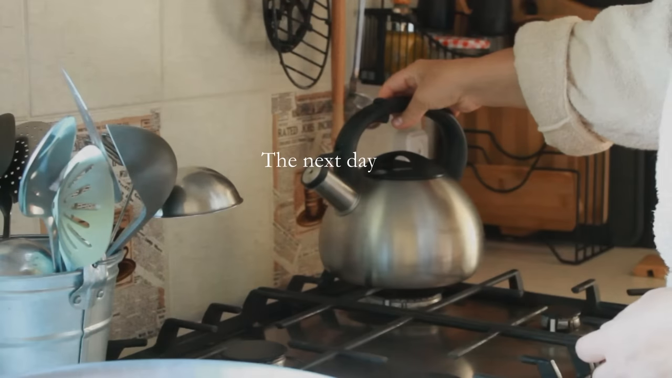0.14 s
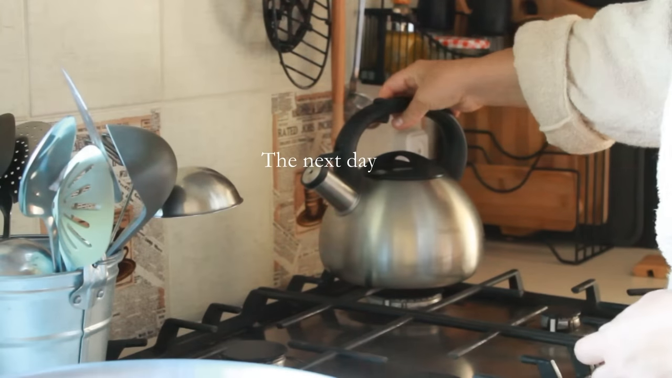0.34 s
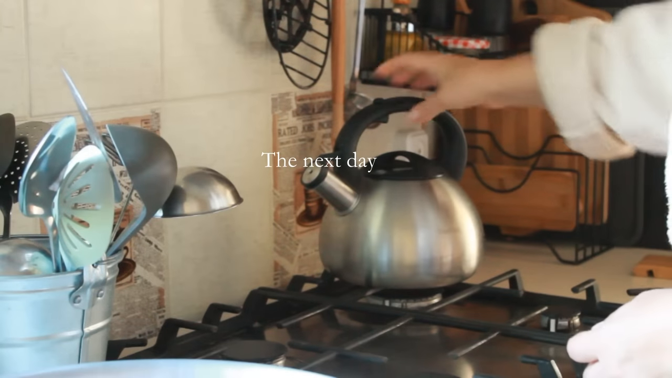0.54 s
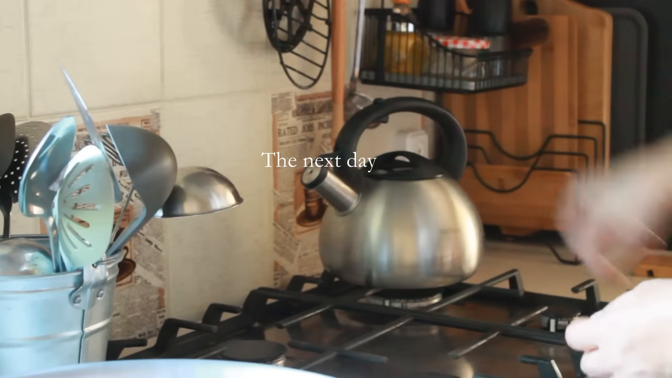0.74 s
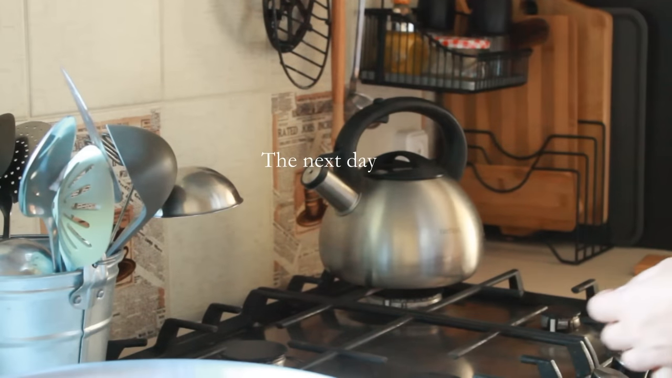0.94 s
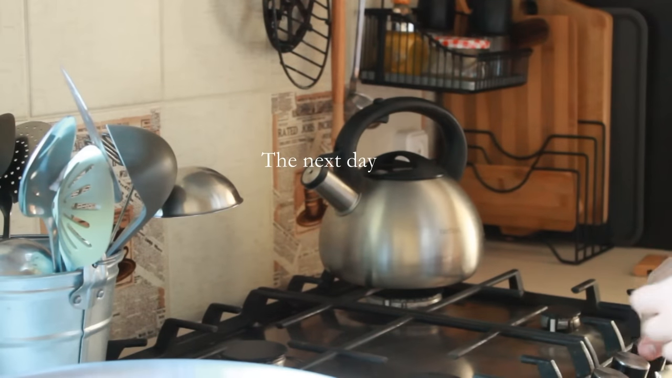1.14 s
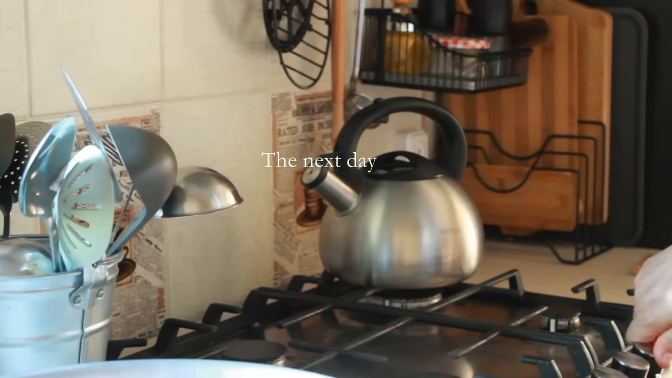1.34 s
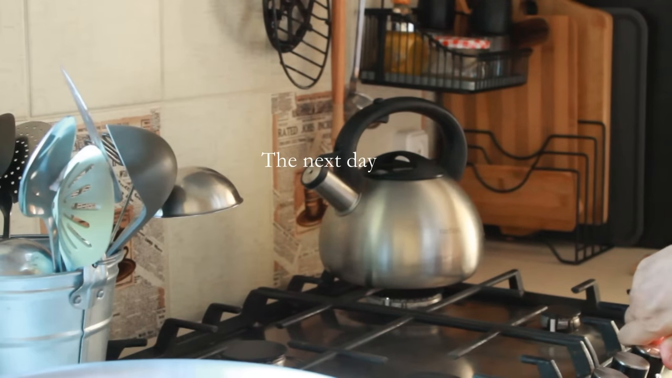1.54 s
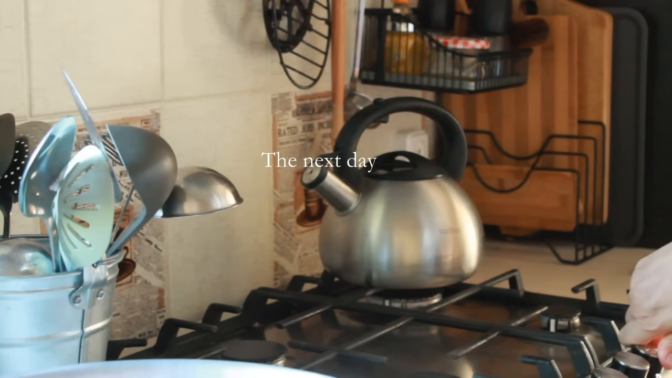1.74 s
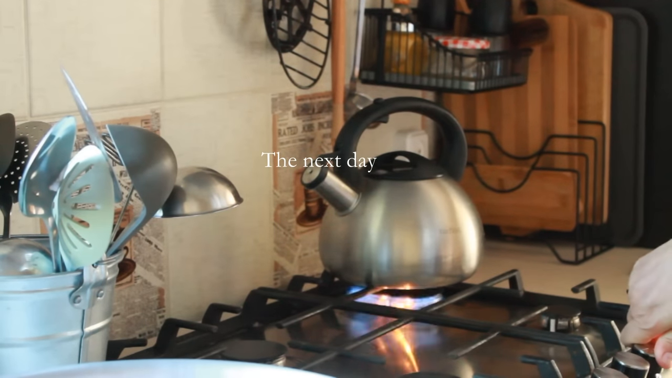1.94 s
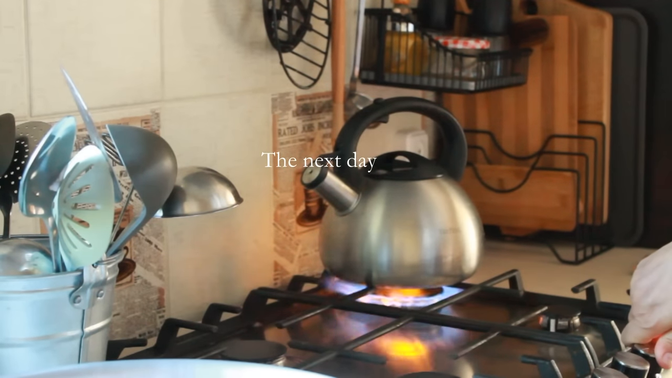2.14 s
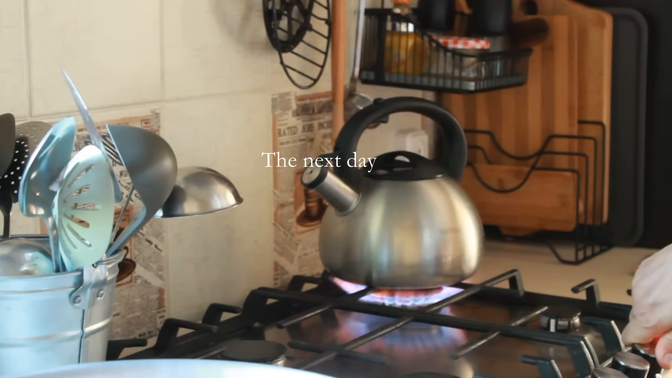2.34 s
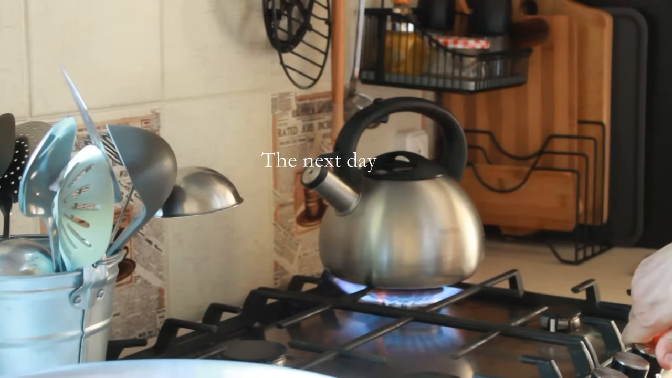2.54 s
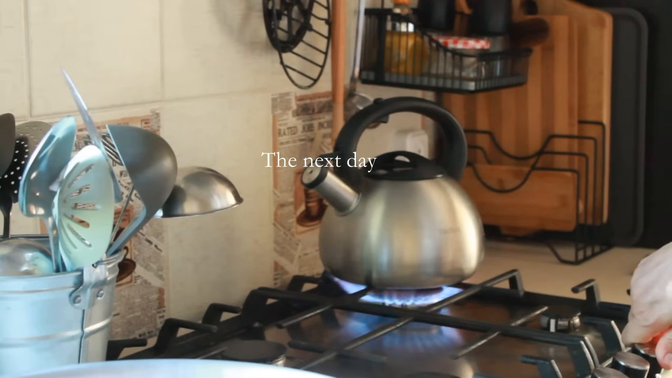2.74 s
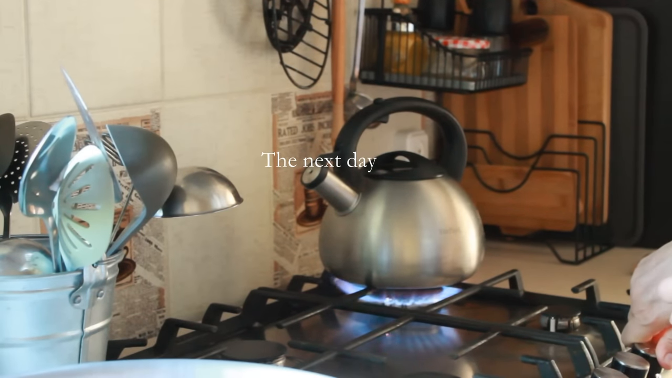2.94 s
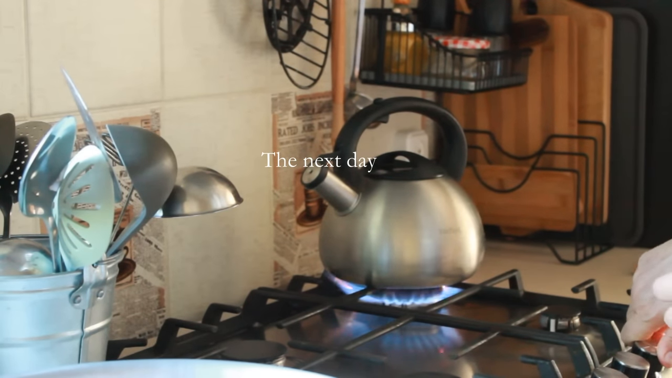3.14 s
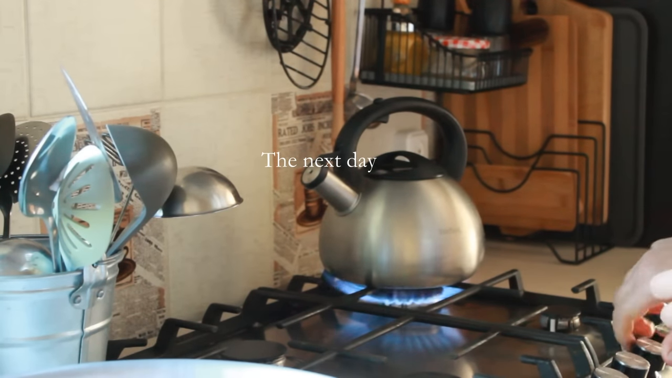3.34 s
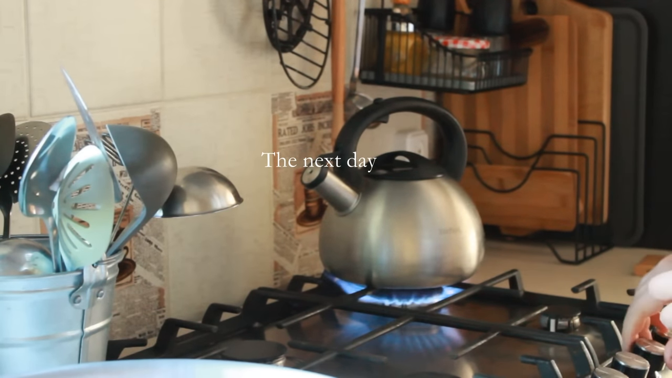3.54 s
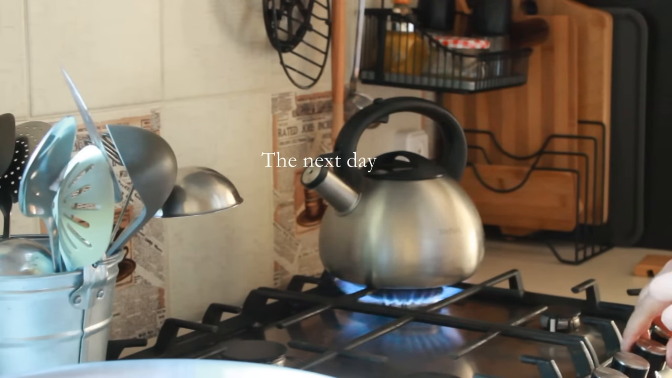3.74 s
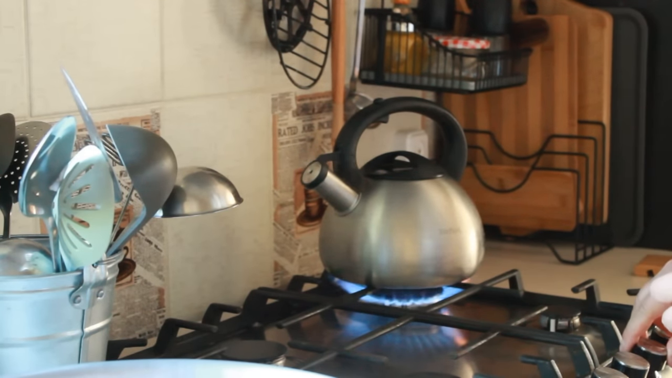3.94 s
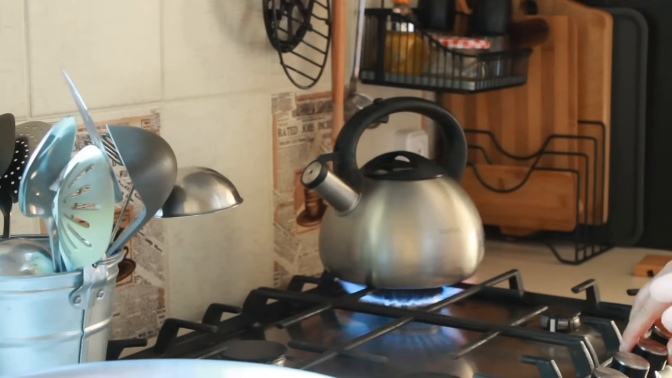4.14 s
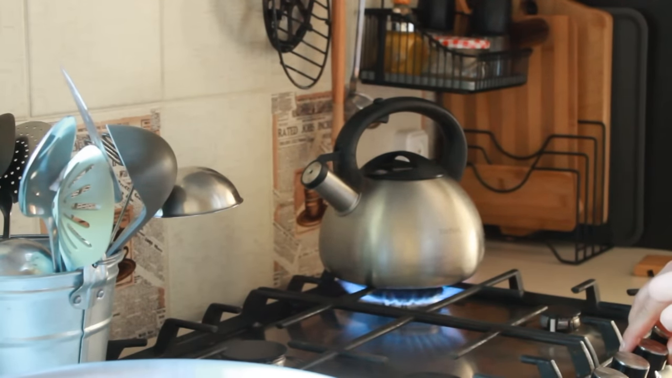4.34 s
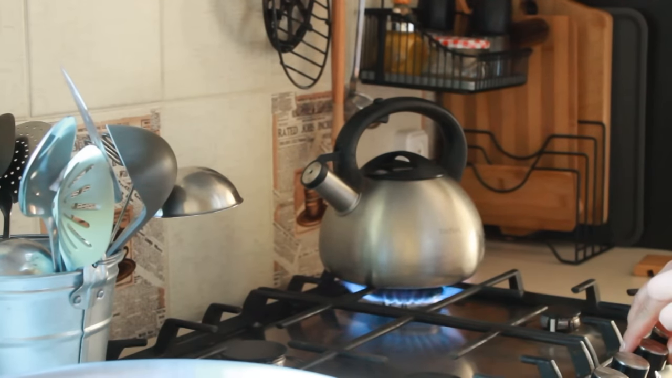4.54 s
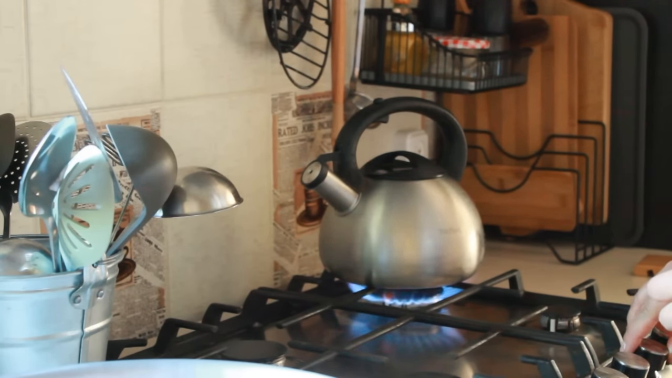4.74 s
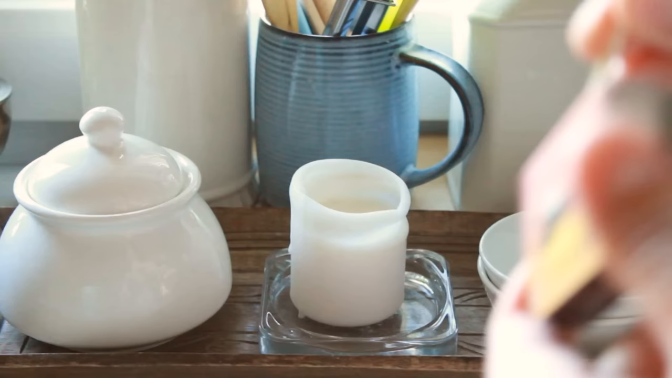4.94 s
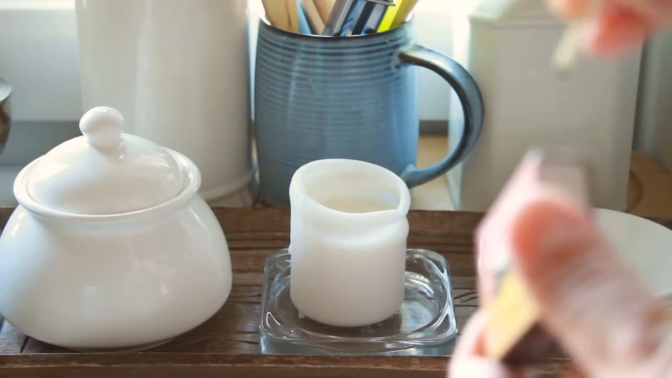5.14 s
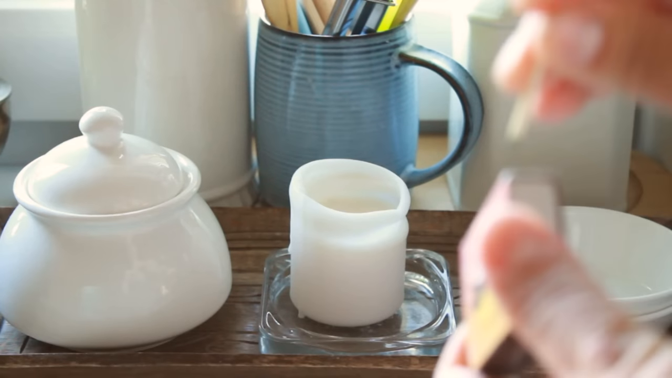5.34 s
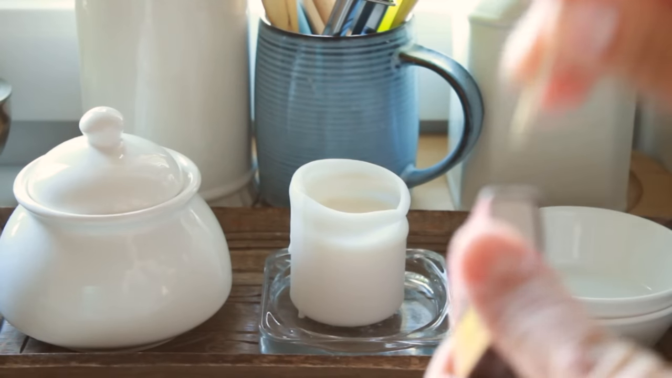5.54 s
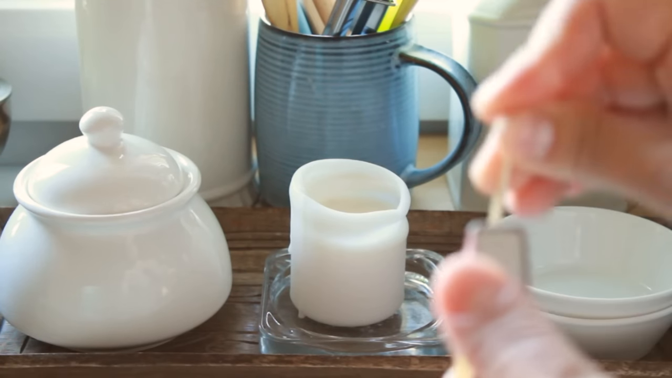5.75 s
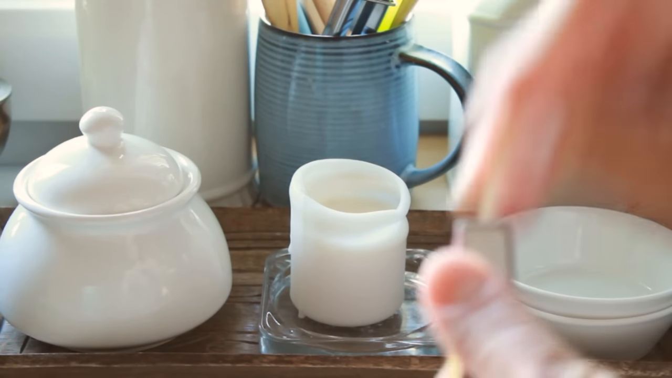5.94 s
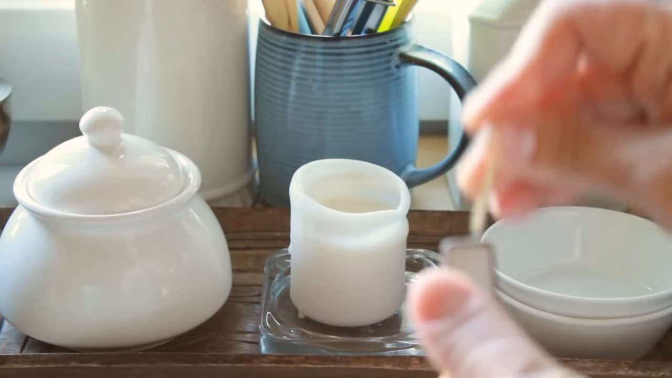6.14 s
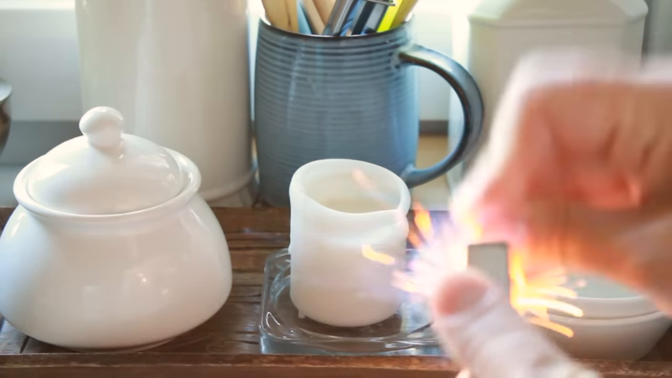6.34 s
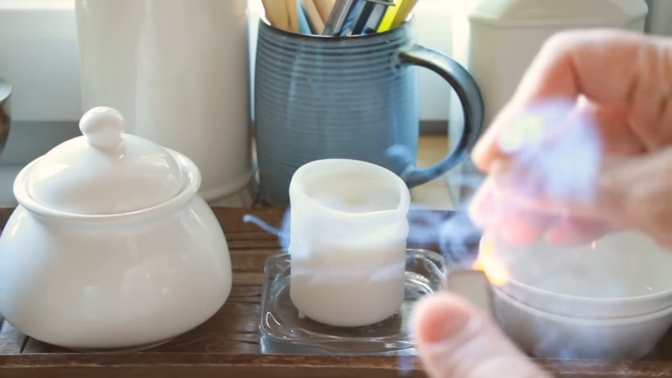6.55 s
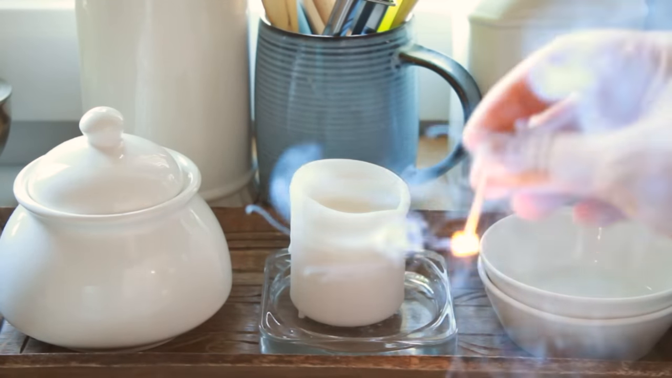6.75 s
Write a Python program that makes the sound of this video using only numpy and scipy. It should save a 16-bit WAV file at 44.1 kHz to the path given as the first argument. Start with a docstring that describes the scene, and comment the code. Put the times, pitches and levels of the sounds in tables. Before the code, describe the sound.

In a quiet tiled kitchen, heard from close by, a metal kettle clanks and rocks briefly on a gas stove. The knob knocks lightly, then sharp, evenly spaced igniter clicks sound over hissing gas as the flame softly catches. The background changes to a low room hum. A match rasps on a hollow cardboard box three times, then bursts alight with a puff and a short, spitting crackle.

```python
"""Lighting a stove and a match

A steel kettle lands on the grate of a gas stove and rings in its natural modes. Gas hisses through the
resonant burner tube, the igniter sparks five times and the flame catches with a soft whoomp. Then, in a
humming corner of the kitchen, a match is struck three times: friction drives the resonances of the
hollow box, and on the last stroke the head flares, fizzes and spits."""
import sys
import numpy as np
from scipy import signal
from scipy.fft import rfft, irfft, next_fast_len
from scipy.io import wavfile
from scipy.ndimage import map_coordinates

SR = 44100
rng = np.random.default_rng(int(sys.argv[2]) if len(sys.argv) > 2 else 0)


def output_pcm(signal):
    """Save a mono or channel-first signal as 16-bit PCM at the path in sys.argv[1].

    Samples are clipped to [-1, 1] before scaling.
    """
    pcm = np.clip(np.atleast_2d(signal).T, -1, 1) * 32767
    wavfile.write(sys.argv[1], SR, np.round(pcm).astype(np.int16))


N = 303849
TIME = np.arange(N) / SR

# Levels in the tables are relative; spectra are interpolated on a logarithmic frequency axis.
# reverberation time of the tiled kitchen: f/Hz, T60/s
ROOM_DECAY = [(150, 0.7), (800, 0.46), (2000, 0.4), (5000, 0.44), (9000, 0.31), (16000, .22)]
# room tone by the stove: f/Hz, level/dB
STOVE_AIR_SPECTRUM = [(15, -53), (25, -27), (59, -10), (92, -31.5), (137, -7.5), (373, -18), (451, -10.5),
                      (659, -10), (2220, -13), (2690, -13), (16000, -30)]
# modes of kettle and grate: f/Hz, level/dB, T60/s before added damping
STEEL_MODES = [(391, -6, 0.67), (855, -3.5, 0.62), (1303, -0.5, 0.54), (2199, -11, 0.5), (3130, -14, 0.42),
               (3250, -4.5, 0.32), (3606, -6.5, 0.36), (3822, -15, 0.3), (4030, -9, 0.38), (4590, -1, 0.4),
               (5210, -9, 0.3), (5520, -16, 0.32), (5660, -11, 0.35), (6210, -11, 0.35), (6440, -17, 0.44),
               (6860, -7, 0.36), (6970, -18, 0.32), (7640, -15, 0.35), (7790, -2.5, 0.4), (8800, -12, 0.38),
               (8560, -17, 0.31), (9300, -10, 0.29), (10142, -23, 0.35)]
# steel chattering on iron: f/Hz, level/dB
CLASH_SPECTRUM = [(500, -35), (1000, -21), (2000, -3.5), (4500, 0), (7500, -2), (10000, -15), (13000, -19),
                  (16000, -18)]
# thud of the stove top: f/Hz, level/dB
THUD_SPECTRUM = [(30, -17), (65, -9), (90, -11), (140, -5.5), (300, -7.5), (470, -0.5), (650, -5.5),
                 (950, -3.5), (1400, -7.5), (2000, -17), (6000, -28), (12000, -49)]
# the handle drops and the knob is pushed in: t/s, level/dB
KNOCK_EVENTS = [(.44, -62.5), (.541, -53), (1.246, -59.5), (1.368, -66.5)]
# a soft blow on the stove: f/Hz, level/dB
KNOCK_SPECTRUM = [(30, -17), (65, -4), (90, -13), (140, -8), (300, -8), (490, 1.5), (650, -4), (950, -5),
                  (1450, -9), (2200, -21), (6000, -40)]
# dull bumps of hand and arm: t/s, level/dB
BUMP_EVENTS = [(.55, -70), (0.969, -66), (5.29, -58), (5.88, -52), (5.971, -56)]
# one such bump: f/Hz, level/dB
BUMP_SPECTRUM = [(30, -14), (70, -16), (140, 1), (230, 1.5), (400, -9), (1500, -73)]
# light clicks of handle, knob and matchbox: t/s, level/dB
TICK_EVENTS = [(.703, -64), (1.28, -62), (1.366, -66), (4.979, -46)]
# rasp of the striking strip, also used for clicks, rustle and fizz: f/Hz, level/dB
GRIT_SPECTRUM = [(800, -29), (1700, 1), (4300, 0), (5600, -4.5), (8000, -5.5), (11000, -17.5), (16000, -16)]
# hiss of the gas jet: f/Hz, level/dB
JET_SPECTRUM = [(59, -41), (100, -47), (322, -6.5), (818, -15.5), (1420, 7.5), (2100, -27), (3320, -3),
                (3780, -22), (4980, -0.5), (5530, -16), (9410, -23), (11200, -19), (16000, -21)]
# burner tube resonances once the burner is hot and settled: f/Hz, bandwidth/Hz, level/dB
TUBE_RESONANCES = [(1287, 80, -4), (3282, 85, 2), (4037, 69, -4.5), (4916, 90, -3.5), (6430, 110, -8.5),
                   (6960, 150, -10.5), (7670, 56, -13), (8960, 47, -8.5), (8700, 55, -11), (9800, 50, -12),
                   (10240, 70, -12), (10800, 55, -4), (11280, 120, -10.5), (11600, 150, -12.5),
                   (13120, 91, -10.5), (13800, 63, -15), (14350, 90, -12), (15300, 300, -15)]
# cold gas in the burner ports: f/Hz, bandwidth/Hz, level/dB
PORT_RESONANCES = [(950, 160, 0.5), (4650, 500, 0.5), (6100, 700, -4), (7580, 200, -1), (11000, 500, -9),
                   (15300, 460, -6)]
# igniter sparks: t/s, level/dB
SPARK_EVENTS = [(1.6312, 0.5), (1.99, 2.5), (2.349, 0), (2.7087, 0), (3.0527, 0)]
# paths from the spark, direct and by way of burner, hob and kettle: delay/s, level/dB
SPARK_PATHS = [(0, 2.5), (.00028, 0), (.00055, -12), (.00082, 7), (.00104, 1.5), (.00162, -19), (.00212, 1)]
# snap of the arc: f/Hz, level/dB
SNAP_SPECTRUM = [(300, -35.5), (900, -19.5), (1500, -14), (2700, -10), (4100, -6), (5200, -6.5), (7500, 0),
                 (10000, -0.5), (12000, -6.5), (15500, -11.5), (17000, -30)]
# the gas catches on one side of the burner, then on the other: t/s, level/dB
CATCH_EVENTS = [(1.99, -45.5), (2.1, -48.5)]
# combustion noise of the burner: f/Hz, level/dB
FLAME_SPECTRUM = [(30, -24), (80, -19), (140, -7), (320, -4.5), (450, -5), (650, -12), (950, -8),
                  (1500, -15), (2500, -22), (6000, -46)]
# room tone by the table: f/Hz, level/dB
TABLE_AIR_SPECTRUM = [(15, -72), (25, -16), (59, -13), (78, -26), (97, -5), (127, -12), (309, -2), (335, 0),
                      (373, -6.5), (476, -3.5), (754, -7.5), (936, -4), (1230, -9.5), (7920, -20),
                      (16000, -34.5)]
# partials of the appliance hum: f/Hz, level/dB
HUM_PARTIALS = [(65, 5.5), (209, -3.5), (270, -13), (340, -1.5), (472, -3)]
# match strokes: t/s, duration/s, tap/dB, scrape/dB, swell of the scrape/dB, rasp/dB, squeak/dB
MATCH_STROKES = [(5.6493, 0.058, -10, -27, -9.5, -32.5, -50), (6.0129, 0.061, -19, -23.5, -3, -33.5, -30.5),
                 (6.3551, 0.056, -22, -23.5, -1, -27.5, -35)]
# hollow knock of the matchbox: f/Hz, level/dB, T60/s
TAP_MODES = [(1226, -11.5, 0.059), (1503, -3, 0.063), (2540, -14, 0.072), (4310, -22, 0.036)]
# resonances of the scraped box: f/Hz, bandwidth/Hz, level/dB
BOX_RESONANCES = [(1223, 17, 1), (1275, 16, 0), (1394.5, 14, 6), (1510, 16, 5.5), (1610, 14, 0.5),
                  (1640, 16, 1.5), (1789, 17, 2), (1990, 16, 0), (2090, 24, -2), (2197, 19, -1),
                  (2350, 15, 0), (2535, 39, -1), (2677, 22, -5), (2905, 19, -2), (3386, 22, -7),
                  (3792, 18, -7.5), (4024, 22, -8), (4270, 68, -7), (4580, 50, -8), (8110, 120, -14)]
# broad response of its cardboard walls: f/Hz, level/dB
CARDBOARD_SPECTRUM = [(200, -48), (700, -49), (1000, -14), (1220, -3), (1550, 2), (2200, -4.5), (2800, -2),
                      (3400, -13.5), (4400, -7), (5500, -11.5), (8000, -15), (11000, -32), (16000, -33)]
# puff of gas from the match head: f/Hz, level/dB
PUFF_SPECTRUM = [(40, -31), (150, -13), (330, -9), (500, -1), (800, -8), (2000, -17.5), (8000, -65)]
# the burning head spits: t/s, puff/dB, fizz/dB
SPIT_EVENTS = [(6.635, -53, -56), (6.694, -53.5, -68), (6.741, -50, -51.5), (6.846, -57, -49)]

TABLE_FROM_S = 4.98  # the scene moves from the stove to the table


def amp(db):
    """Amplitude ratio of a level in decibels."""
    return 10 ** (np.asarray(db) / 20)


def unit(x):
    """Normalisation to rms 1."""
    return x / np.sqrt(np.mean(x ** 2) + 1e-20)


def since(s):
    """Time elapsed after the instant s, zero before it."""
    return np.maximum(TIME - s, 0)


def along(points, hz):
    """Interpolation of (f/Hz, value) points on a logarithmic frequency axis."""
    f, values = np.transpose(points)
    return np.interp(np.log(hz + 1), np.log(f + 1), values)


def wobble(rate):
    """Random modulation: a spline through `rate` Gaussian values a second."""
    return map_coordinates(rng.standard_normal(int(N * rate / SR) + 4), [TIME * rate])


def response(spectrum, peaks=(), peaks_db=0, size=8192):
    """Minimum-phase impulse response of energy 1: Lorentzian resonances on a broad spectrum."""
    hz = np.fft.rfftfreq(size, 1 / SR)
    resonances = sum(amp(db + peaks_db) ** 2 / (1 + (2 * (hz - f) / width) ** 2)
                     for f, width, db in peaks)
    power = amp(along(spectrum, hz)) ** 2 + resonances
    cepstrum = irfft(np.log(power + 1e-12) / 2)
    cepstrum[1:size // 2] *= 2  # folding the cepstrum makes the response causal
    cepstrum[size // 2 + 1:] = 0
    h = irfft(np.exp(rfft(cepstrum)))
    return h / np.linalg.norm(h)


def through(x, h):
    """Linear filtering: x convolved with the impulse response h."""
    return signal.fftconvolve(x, h)[:N]


def noise(spectrum, peaks=()):
    """White noise filtered to a spectrum and its resonances, rms 1."""
    return unit(through(rng.standard_normal(N), response(spectrum, peaks)))


def grains(rate, spread_db):
    """Shot noise of rms 1: on average `rate` impulses a second, of uneven size."""
    size = amp(spread_db * np.clip(rng.standard_normal(N), -2, 2))
    occurs = rng.random(N) < rate / SR
    return unit(occurs * size * np.sign(rng.standard_normal(N)))


def burst(s, rise_s, t60_s):
    """Envelope from time s: a linear rise to 1, then exponential decay."""
    age = since(s)
    return np.minimum(age / rise_s, 1) * amp(-60 * np.maximum(age - rise_s, 0) / t60_s)


def bursts(events, rise_s, t60_s):
    """Superposition of one burst for each (t/s, level/dB) event."""
    return sum(amp(db) * burst(s, rise_s, t60_s) for s, db in events)


def impulse(s):
    """Unit impulse at time s."""
    return 1. * (np.arange(N) == round(s * SR))


def ringing(modes, s, scatter_db, damping=1):
    """Free vibration after a blow at time s: damped sinusoids of random strength and phase."""
    t = np.arange(SR // 2) / SR
    ring = 0
    for hz, db, t60 in modes:
        envelope = amp(db + rng.normal(0, scatter_db) - 60 * damping * t / t60)
        ring += envelope * np.sin(2 * np.pi * (hz * t + rng.random()))
    attack = np.minimum(t / .0015, 1)
    return np.pad(ring * attack, (round(s * SR), N))[:N]


def kitchen(x, wet_db, gap_s=.003):
    """Reverberation: the direct sound plus a diffuse tail whose decay depends on frequency."""
    hz, t, bands = signal.stft(rng.standard_normal(SR // 2), SR, nperseg=256)
    decay = amp(-60 * t / along(ROOM_DECAY, hz)[:, None])
    tail = signal.istft(bands * decay, SR, nperseg=256)[1]
    tail *= np.arange(len(tail)) / SR > gap_s
    return x + amp(wet_db) * through(x, tail / np.linalg.norm(tail))


def stove_air():
    """Stationary background noise by the stove."""
    return amp(-69.5) * noise(STOVE_AIR_SPECTRUM)


def kettle(land_s=.0105, skid_s=.014, first_rock_s=.041, rock_ratio=.95, rocks=5):
    """Impact excitation: the kettle lands, skids and rocks ever faster; each contact rings the steel."""
    rock = np.arange(rocks)
    times = land_s + np.r_[0, skid_s, np.cumsum(first_rock_s * rock_ratio ** rock)]
    contact_db = np.r_[-41.5, -50, -52.5 - 3 * rock]  # landing, skid, weakening rocks
    ring = sum(amp(db) * ringing(STEEL_MODES, s, scatter_db=2, damping=1.5)
               for s, db in zip(times, contact_db))
    ring *= 1 + .5 * wobble(160)  # the base buzzes against the bars, which roughens the ring
    chatter = bursts(zip(times, contact_db + 2.5), rise_s=.002, t60_s=.11)
    clash = through(chatter * grains(rate=2500, spread_db=6.5), response(CLASH_SPECTRUM))
    thud_db = -40.5 - 6 * np.linspace(-1, 1, len(times)) ** 2  # the middle contact is the heaviest
    thud_power = sum((amp(db) * burst(s, rise_s=.0041, t60_s=.23)) ** 2 for s, db in zip(times, thud_db))
    thud = np.sqrt(thud_power) * noise(THUD_SPECTRUM)
    return kitchen(ring + clash + thud, wet_db=-5.5)


def handling():
    """Heavily damped impacts give knocks, clicks and bumps; the friction of a sleeve gives a rustle."""
    knock = bursts(KNOCK_EVENTS, rise_s=.009, t60_s=.27)
    tick = bursts(TICK_EVENTS, rise_s=.0018, t60_s=.12)
    sleeve = amp(-66.5) * burst(.59, rise_s=.048, t60_s=.42)
    body = (knock + amp(-11) * tick) * noise(KNOCK_SPECTRUM)
    surface = (tick + sleeve) * noise(GRIT_SPECTRUM)
    bumps = bursts(BUMP_EVENTS, rise_s=.0078, t60_s=.13) * noise(BUMP_SPECTRUM)
    return kitchen(body + surface + bumps, wet_db=-4)


def gas(valve_s=1.382, opening_s=.097, turn_down_s=4.3, heat_s=2.14, heat_rise_s=.17):
    """Jet noise excites ports and tube; heat makes the tube louder and briefly raises its resonances."""
    opening = 1 - np.exp(-since(valve_s) / opening_s)
    flow = opening * amp(-59.5 - 6.5 * since(turn_down_s))  # the knob is eased back
    heat_age = since(heat_s) / heat_rise_s
    cold = np.exp(-heat_age)
    heat = (heat_age * np.exp(1 - heat_age)) ** 2  # rises to 1, then relaxes
    pitch_ratio = .99 ** cold + .17 * heat * (1 + .17 * wobble(60))
    flat_floor = [(1000, -60)]
    tube = noise(flat_floor, TUBE_RESONANCES)
    tube = amp(-3 - 3 * cold) * map_coordinates(tube, [np.cumsum(pitch_ratio)], mode="wrap")
    ports = amp(-5) * cold * noise(flat_floor, PORT_RESONANCES)
    jet = amp(-3.8 - 2 * cold) * noise(JET_SPECTRUM)
    return kitchen(flow * amp(.56 * wobble(9)) * (tube + jet + ports), wet_db=-6.5)


def igniter():
    """Early reflections: each spark is an impulse, mirrored by the nearby steel and then by the room."""
    snap, out = response(SNAP_SPECTRUM), np.zeros(N)
    for s, db in SPARK_EVENTS:
        # the arc takes a new route every time, so the paths vary in strength
        near = sum(amp(path_db + rng.normal(0, 1.2)) * impulse(s + delay)
                   for delay, path_db in SPARK_PATHS)
        scatter = amp(-22) * burst(s + .0012, rise_s=.0017, t60_s=.046) * grains(rate=5000, spread_db=7)
        walls = kitchen(impulse(s), wet_db=10.5, gap_s=.0026) - impulse(s)
        out += amp(db - 14.5) * through(near + scatter + walls, snap)
    return out


def flame(growth_s=.86, calming_db_per_s=9.5):
    """Combustion noise: the gas catches with a fluttering whoomp; a soft burn builds, then calms."""
    whoomp = bursts(CATCH_EVENTS, rise_s=.081, t60_s=.23)
    lit_s = CATCH_EVENTS[0][0]
    growth = np.minimum(since(lit_s) / growth_s, 1)
    burn = growth * amp(-66 - calming_db_per_s * since(lit_s + growth_s))
    flutter = amp(1.1 * wobble(45))
    return kitchen((whoomp + burn) * flutter * noise(FLAME_SPECTRUM), wet_db=-9)


def table_air(swell_db_per_s=4):
    """Diffuse noise by the table, and a swelling appliance hum modulated in amplitude and phase."""
    murk = unit(kitchen(noise(TABLE_AIR_SPECTRUM), wet_db=-6.5))
    hum = sum(amp(db + 2.8 * wobble(21)) * np.sin(2 * np.pi * hz * TIME + .5 * wobble(3.9))
              for hz, db in HUM_PARTIALS)
    hum_gain = amp(-73 + swell_db_per_s * since(TABLE_FROM_S))
    return amp(-59 + .23 * wobble(7)) * murk + hum_gain * hum


def match(release_t60_s=.02):
    """Sliding friction: the head taps the box, then snags on the grit and drives the box's resonances."""
    box = response(CARDBOARD_SPECTRUM, BOX_RESONANCES, peaks_db=6)
    strip = response(GRIT_SPECTRUM)
    snags, grit = grains(rate=3500, spread_db=4), grains(rate=1600, spread_db=5)
    grip, squeak_tone = amp(1.5 * wobble(220)), squeak()
    out = np.zeros(N)
    for s, duration, tap_db, scrape_db, swell_db, rasp_db, squeak_db in MATCH_STROKES:
        travel = np.clip((TIME - s) / duration, 0, 1)
        pressure = grip * (TIME > s) * amp(-60 * since(s + duration) / release_t60_s)
        tap = amp(tap_db) * ringing(TAP_MODES, s, scatter_db=1)
        scrape = through(amp(scrape_db - .5 + swell_db * (travel - .5)) * pressure * snags, box)
        # as the head gathers speed the bright rasp grows and a squeak sets in
        rasp = through(amp(rasp_db + 3 * (travel - 1.5)) * pressure * grit, strip)
        slips = amp(squeak_db) * travel ** 2 * pressure * squeak_tone
        out += kitchen(tap + scrape + rasp, wet_db=-9, gap_s=.0024) + slips
    return out


def squeak(slip_hz=1095):
    """Stick-slip oscillation at a nearly steady rate: harmonics 4 to 8 of a sawtooth, rms 1."""
    phase = 2 * np.pi * np.cumsum(slip_hz * (1 + .012 * wobble(200))) / SR
    return unit(sum(np.sin(k * phase) / k for k in range(4, 9)))


def flare(lit_s=6.3825):
    """Rapid combustion: the head ignites, fizzes on and spits, with low puffs of gas under a crackle."""
    flash = burst(lit_s, rise_s=.004, t60_s=.19)
    afterburn = burst(lit_s, rise_s=.15, t60_s=1)
    puff = amp(-32) * flash
    fizz = amp(-22) * flash + amp(-56) * afterburn
    for s, puff_db, fizz_db in SPIT_EVENTS:
        spit = burst(s, rise_s=.009, t60_s=.15)
        puff += amp(puff_db) * spit
        fizz += amp(fizz_db) * spit
    crackle = through(fizz * grains(rate=8000, spread_db=3), response(GRIT_SPECTRUM))
    return kitchen(puff * noise(PUFF_SPECTRUM) + crackle, wet_db=-13)


def scene():
    """Superposition of all sources in one channel, first by the stove, then by the table."""
    steady = np.where(TIME < TABLE_FROM_S, gas() + flame() + stove_air(), table_air())
    return (kettle() + handling() + igniter() + match() + flare() + steady)[None]


def record(dry):
    """Band limiting: an ideal low-pass filter removes everything above its cutoff."""
    cutoff_hz = 15800
    size = next_fast_len(N + SR // 2)
    passband = np.fft.rfftfreq(size, 1 / SR) < cutoff_hz
    return irfft(rfft(dry, size) * passband, size)[:, :N]


dry = scene()
out = record(dry)
output_pcm(out)
```